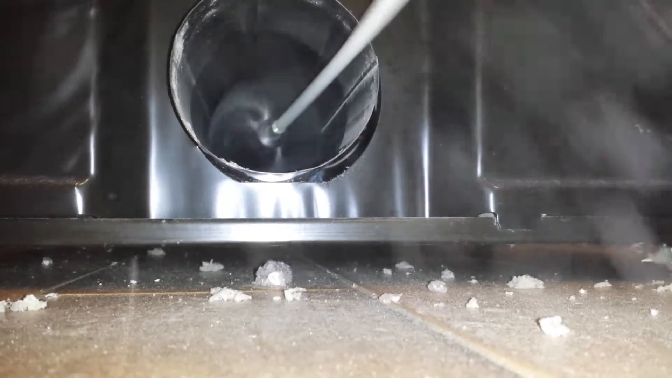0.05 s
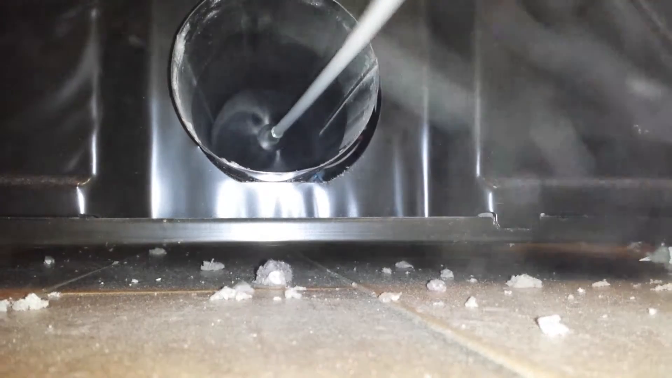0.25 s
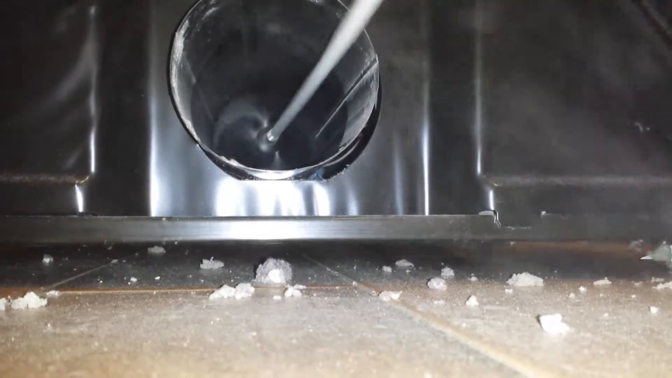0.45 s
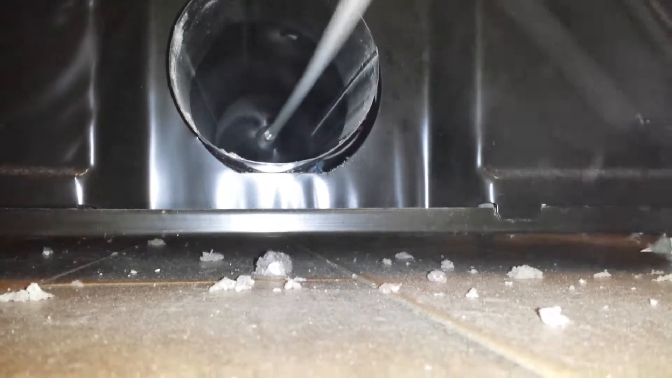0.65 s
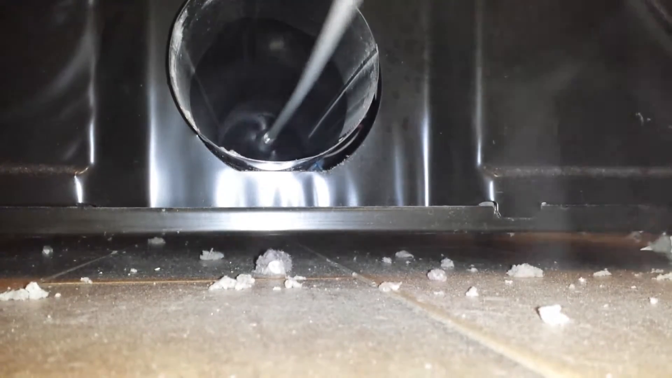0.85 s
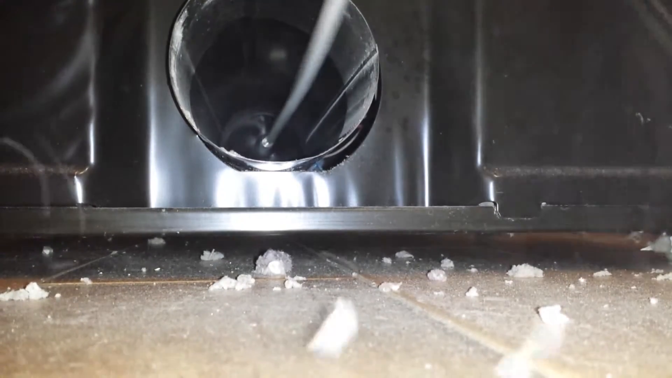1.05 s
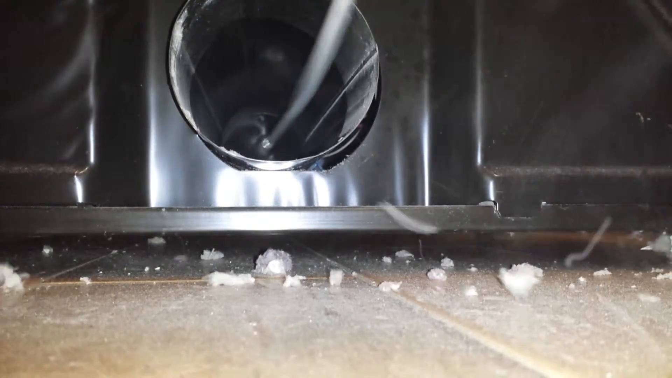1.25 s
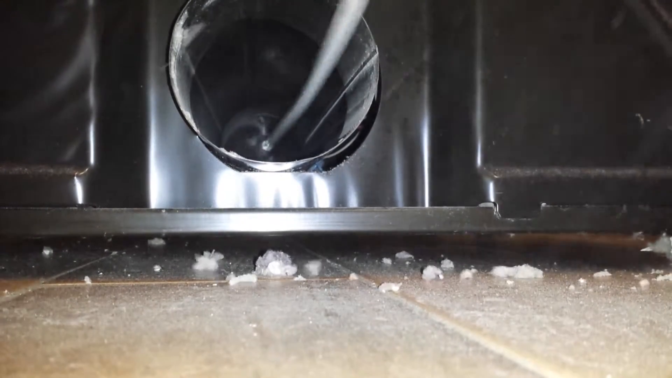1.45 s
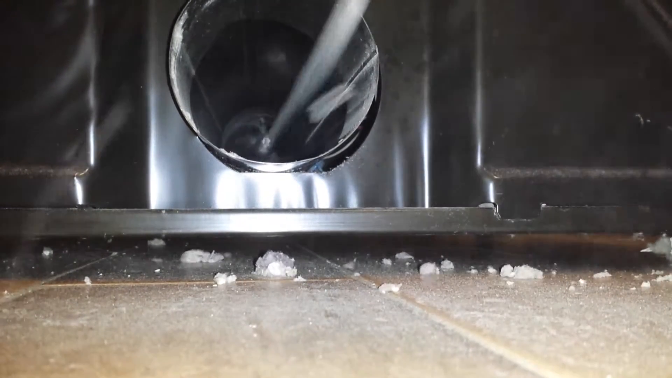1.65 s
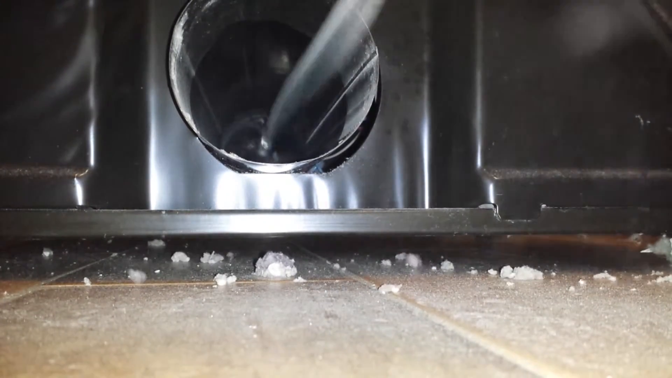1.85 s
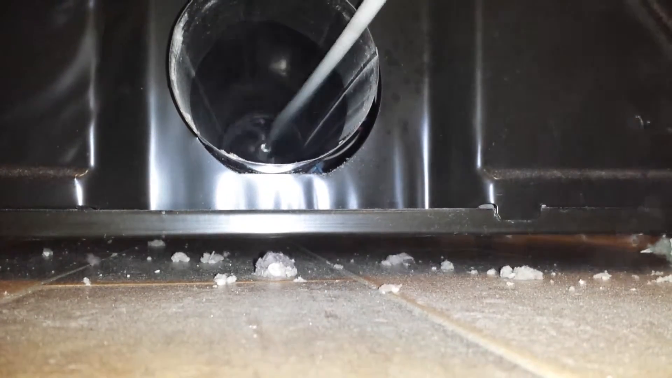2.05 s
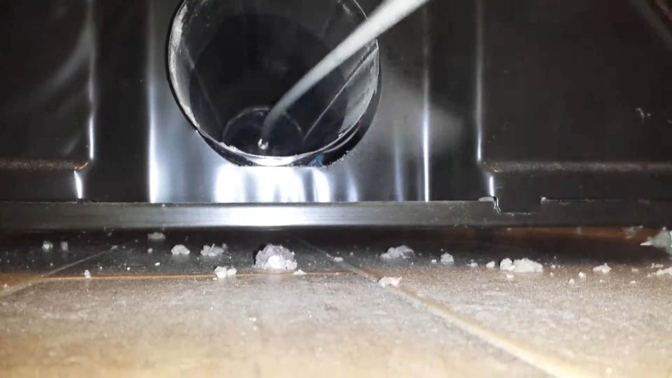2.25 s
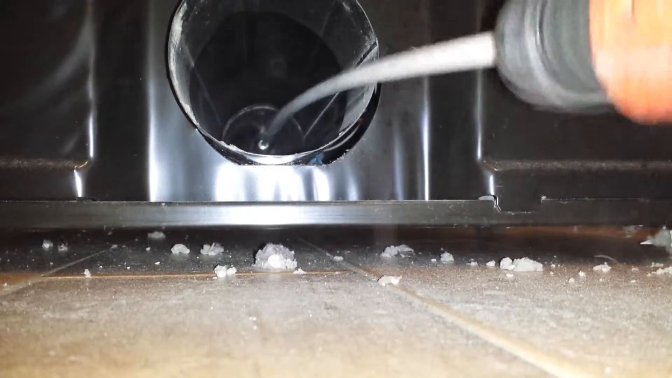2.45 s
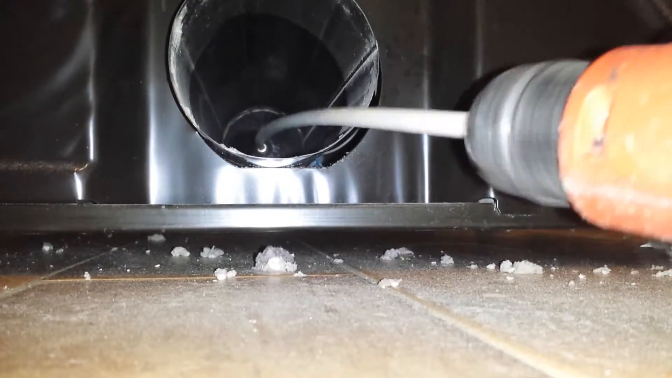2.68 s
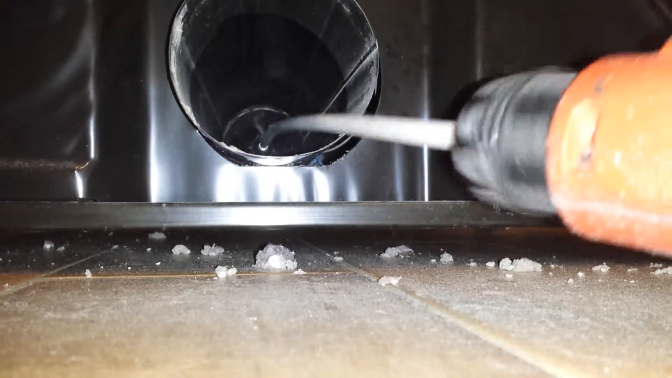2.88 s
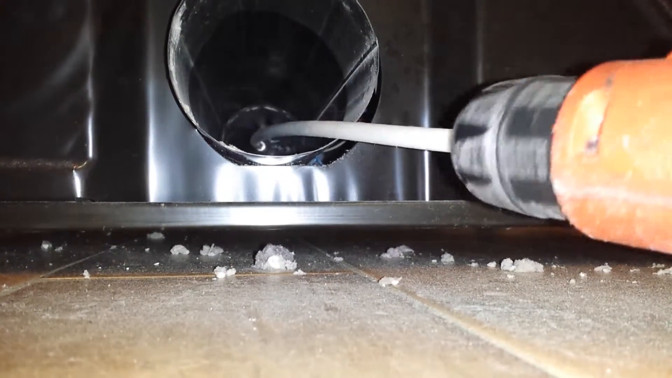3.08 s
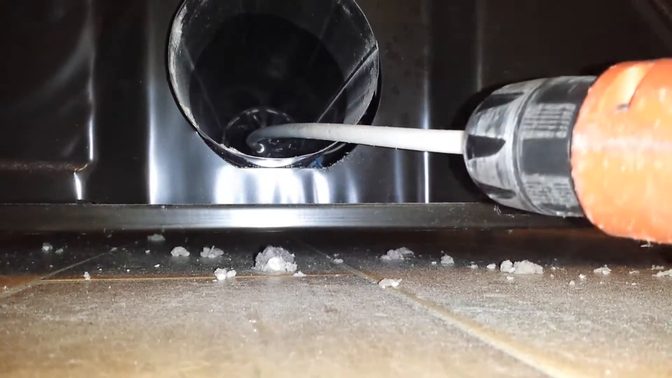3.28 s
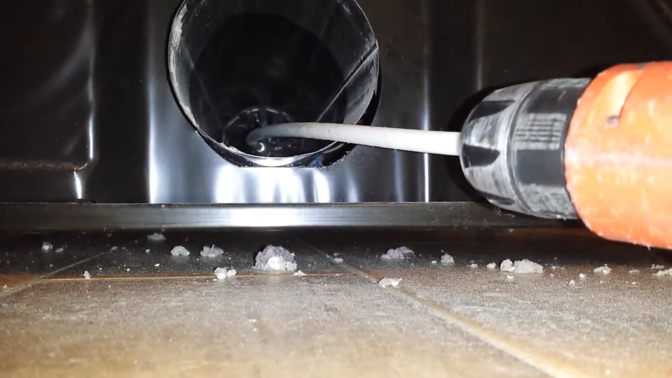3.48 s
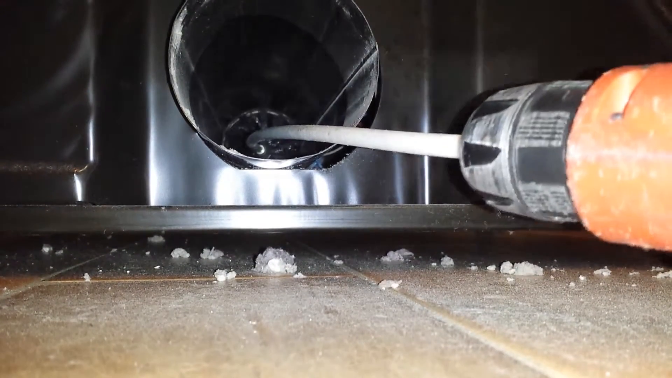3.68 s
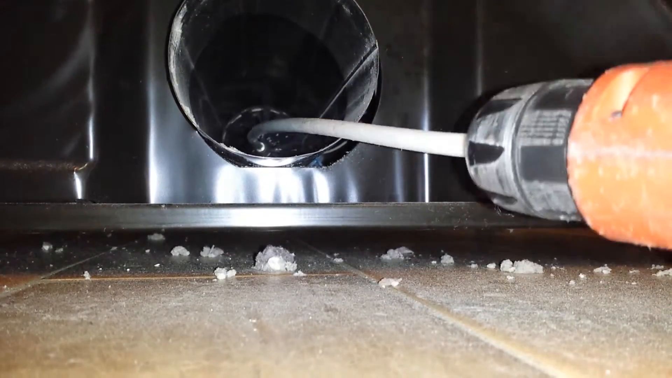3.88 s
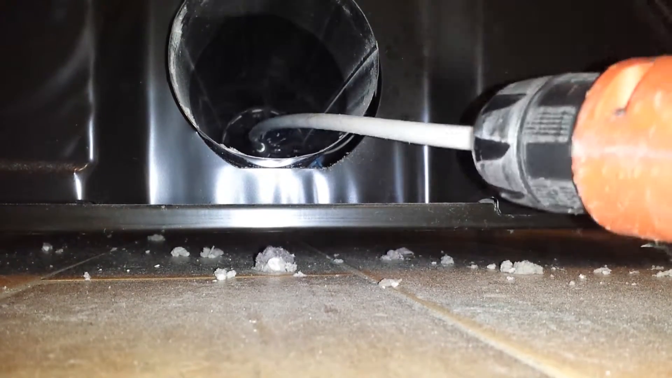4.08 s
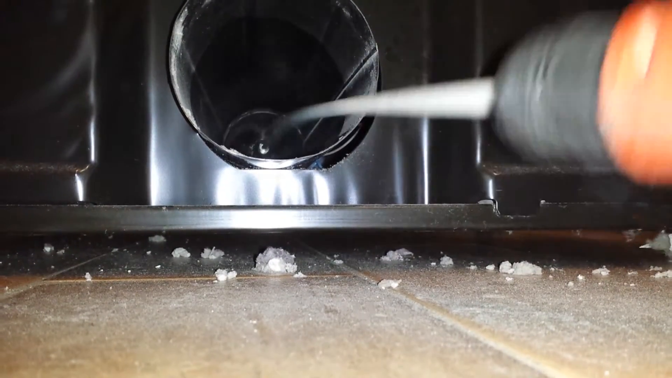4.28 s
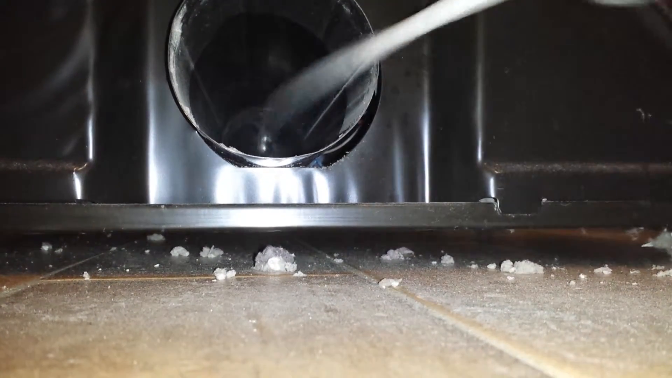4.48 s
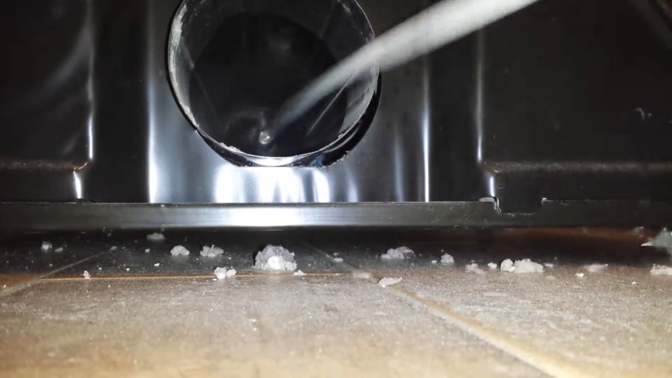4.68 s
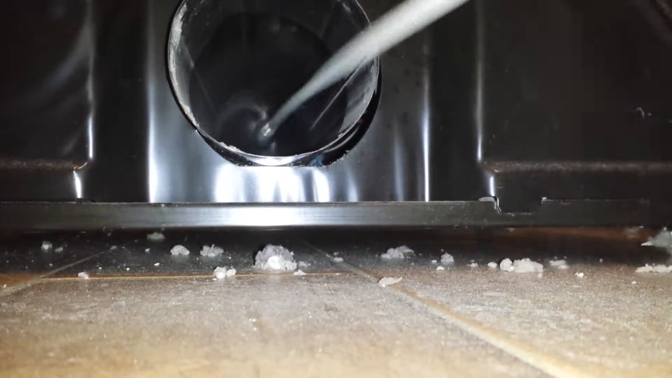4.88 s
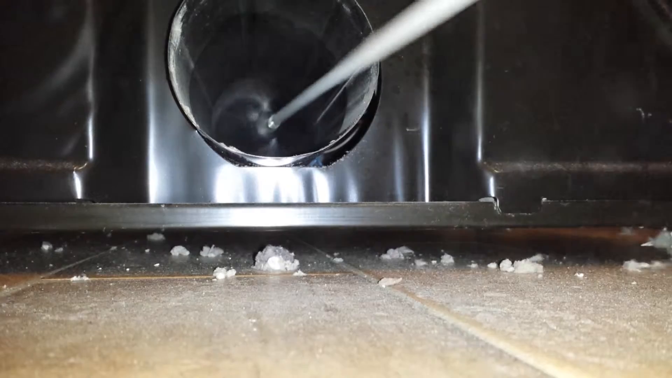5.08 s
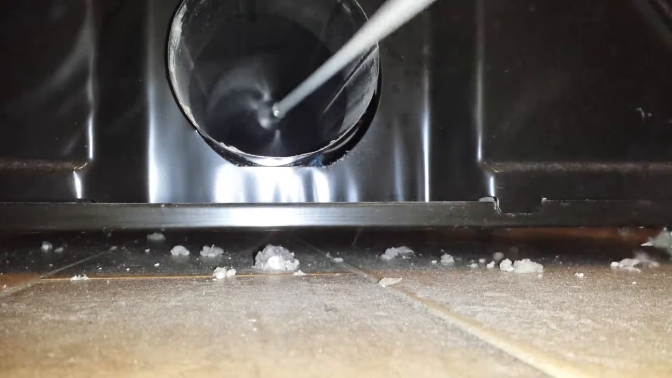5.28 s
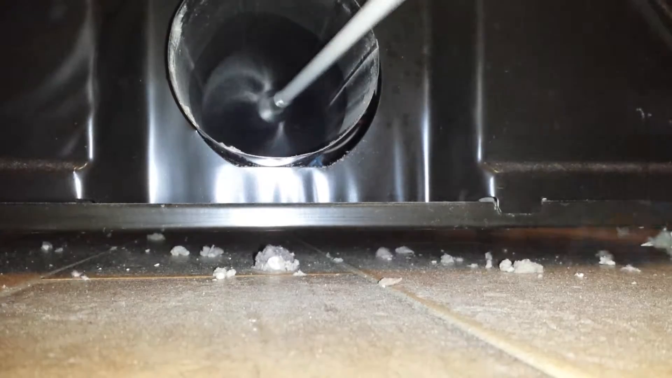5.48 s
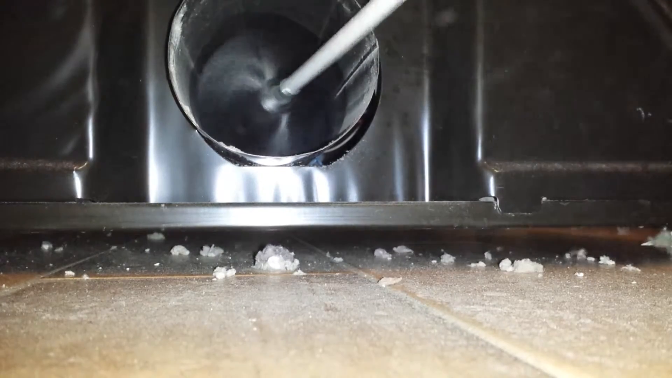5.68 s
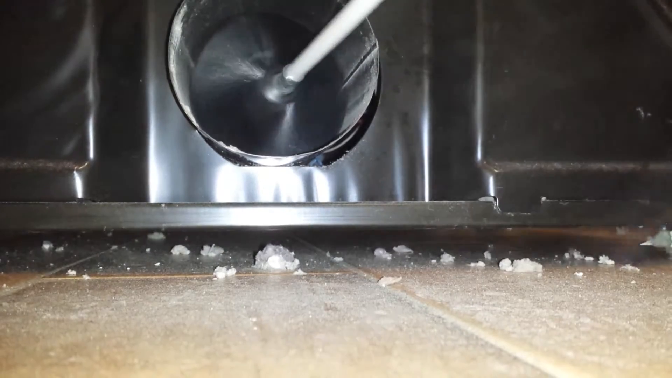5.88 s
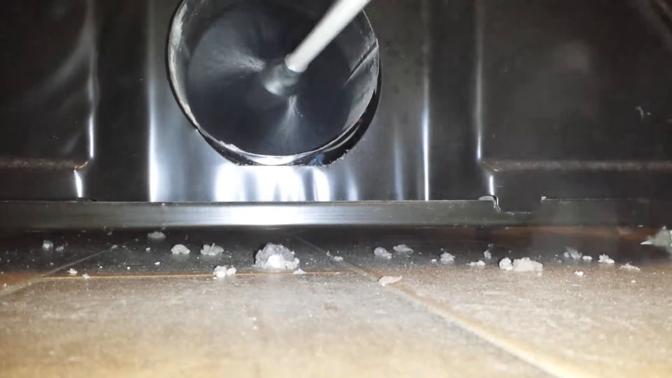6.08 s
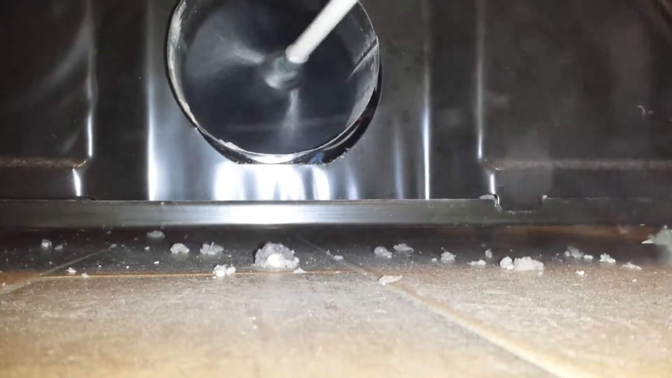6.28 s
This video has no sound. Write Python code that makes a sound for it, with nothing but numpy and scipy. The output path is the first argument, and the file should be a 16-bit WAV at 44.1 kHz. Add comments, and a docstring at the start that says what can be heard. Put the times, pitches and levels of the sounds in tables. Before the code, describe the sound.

Close, raspy drill whine and bristle hiss in a hollow duct slow to silence, then jerky cracks and a fast rising run-up back to speed.

```python
"""In a metal duct, a cordless drill spins a vent brush on a flexible rod, close to the microphone.
It whines at full speed, winds down to a ticking stop, is shifted in the hand, stutters and speeds up again.
One turning shaft drives the whine, the gear rasp and the brush noise; knocks and scrapes are shaped noise.
Cooling air sweeps across the two microphone ports in gusts, twice strongly; a mains hum lies under it all."""
import sys
import numpy as np
from scipy import signal
from scipy.fft import rfft, irfft, next_fast_len
from scipy.io import wavfile
from scipy.ndimage import uniform_filter1d, map_coordinates

SR = 44100
rng = np.random.default_rng(int(sys.argv[2]) if len(sys.argv) > 2 else 0)


def transcribe(signal):
    """Save signal, clipped to [-1, 1], as a 16-bit WAV file at the path in sys.argv[1]."""
    frames = np.atleast_2d(signal).T
    limited = np.clip(frames, -1, 1)
    pcm = np.round(limited * 32767).astype(np.int16)
    wavfile.write(sys.argv[1], SR, pcm)


N = 279594

TEETH = 8  # on the motor's gear
FULL_SPEED = 490  # turns per second
TOP_HZ = 14600  # nothing is heard above this
# Tone colours, from dull to bright: (frequency [Hz], relative level [dB])
# rasp of the gears in their housing
GEARBOX_COLOUR = [(200, -41), (400, -16), (680, -9), (900, -27), (1300, -7.5), (1900, -4.5), (2150, -3.5),
                  (2450, 2.5), (2800, 1.5), (3150, 1.5), (3800, -3.5), (4600, -23), (6000, -6.5),
                  (14000, -25)]
# hiss of the bristles
HISS_COLOUR = [(2350, -25.5), (4000, -6), (4220, -7), (4740, -5.5), (5140, -6.5), (5690, -4), (6670, -3.5),
               (7550, -1.5), (8850, -6.5), (14300, -25)]
# hollow rush in the metal duct
DUCT_COLOUR = [(60, -34), (200, -11.5), (330, -12.5), (480, 0), (620, -2.5), (780, -0.5), (1000, 4.5),
               (1500, 2), (2200, -2.5), (4000, -37)]
# air rumbling on the microphone
AIR_COLOUR = [(15, -58), (30, -29), (60, -7.5), (100, 1), (150, 1.5), (200, 0), (350, -3.5), (450, -5.5),
              (600, -6.5), (1300, -22.5), (2500, -60)]
# How the drill moves in the hand:
# (time [s], gearbox gain [dB], hiss gain [dB], left minus right [dB], brightest part of the hiss [Hz])
HAND_MOVES = [(0, 1, 0, .5, 7760), (.45, -1.5, 1, 2, 7620), (.97, 0, 3.5, 0, 6380),
              (1.2, 0.5, 3.5, -1, 6820), (1.6, 0, 0.4, -1.5, 6890), (2.27, 1, 1, -1, 7100),
              (2.48, 5.5, -0.9, 4, 6600), (2.88, 6, 5, 9.5, 6820), (3.17, -1.5, 2.5, 9, 6800),
              (4.37, 0.5, 1.5, 8.5, 6340), (4.58, 0.5, -1, 2, 6360), (4.72, 0.5, 4.5, 3.5, 6476),
              (4.93, 2, 4, 3.5, 6120), (5.35, -1, 0, 3, 5630), (5.75, 3, -.3, 4.5, 6210),
              (6.34, -0.5, -1, 3, 6300)]


def amp(db):
    """Decibels to gain."""
    return 10 ** (np.asarray(db) / 20)


def unit(x):
    """Scale so that the mean of the channels has an average strength (rms) of 1."""
    return x / np.sqrt(np.mean(np.atleast_2d(x).mean(0) ** 2) + 1e-20)


def along(points, hz):
    """Read a curve of (Hz, value) points, evenly spaced by pitch."""
    f, v = np.transpose(points)
    return np.interp(np.log(hz + 1), np.log(f + 1), v)


def curves(rows):
    """One value per sample for each column after the time."""
    s, *columns = np.transpose(rows)
    return [np.interp(np.arange(N) / SR, s, column) for column in columns]


def wobble(rate):
    """A smooth random curve that takes a new value `rate` times a second."""
    values = rng.standard_normal(int(N * rate / SR) + 4)
    return map_coordinates(values, [np.arange(N) * rate / SR])


def filtered(x, response):
    """Change the strength of each frequency in x by response(Hz)."""
    m = next_fast_len(N + SR // 2)
    return irfft(rfft(x, m) * response(np.fft.rfftfreq(m, 1 / SR)), m)[..., :N]


def coloured(x, colour):
    """Give x a (Hz, dB) tone colour, at rms 1."""
    return unit(filtered(x, lambda hz: amp(along(colour, hz))))


def noise(alike):
    """White stereo noise, partly shared by both sides (0: not at all, 1: fully)."""
    share = np.clip(alike, 0, 1)
    common = np.sqrt(share) * rng.standard_normal(N)
    return common + np.sqrt(1 - share) * rng.standard_normal((2, N))


def pan(lean_db):
    """Left and right gains for a level difference (left minus right)."""
    gains = amp(np.array([[1], [-1]]) * lean_db / 2)
    return gains / np.sqrt(np.mean(gains ** 2, axis=0))


def swell(s, rise, fall):
    """A smooth hump of height 1 at time s."""
    age = np.arange(N) / SR - s
    return np.exp(-(age / np.where(age < 0, rise, fall)) ** 2)


def burst(s, t60):
    """Envelope of a blow at time s: a quick rise, then a fall of 60 dB in t60 seconds."""
    age = np.maximum(np.arange(N) / SR - s, 0)
    return amp(-60 * np.minimum(age / t60, 5)) * (1 - np.exp(-age / 0.0007))


def at_ports(x, lag):
    """The further the drill is to the left, the later it reaches the right port (lag: s per dB)."""
    _, _, lean_db, _ = curves(HAND_MOVES)
    delay = lag * uniform_filter1d(lean_db, SR)
    return np.array([x[0], map_coordinates(x[1], [np.arange(N) - delay * SR])])


def shaft_speed():
    """Turns per second: full speed, a coast against friction and air drag, rest, and the run-up."""
    t = np.arange(N) / SR
    stop_s, friction = 3.2237, 173.75  # standstill (s), braking by friction (turns per s per s)
    drag_speed = 380.2  # air drag brakes as hard as friction here (turns per s)
    coast = drag_speed * np.tan(friction / drag_speed * np.maximum(stop_s - t, 0))
    # the trigger is squeezed again
    restart_s, squeeze_s = 4.24, .252
    pull = np.clip((t - restart_s) / squeeze_s, 0, 1)
    # at full pull the motor closes in on its free speed, in a quick and a slow stage
    since = np.maximum(t - restart_s - squeeze_s, 0)
    free_speed = 493
    run_up = free_speed - 68 * np.exp(-since / .088) - 129 * np.exp(-since / .38)
    return np.minimum(coast, FULL_SPEED) + pull ** 1.27 * run_up


def airflow():
    """Strength of the cooling air at each port: the gusts add in power."""
    # gusts over the microphone:
    # (time [s], strength [dB], rise [s], fall [s], left minus right [dB])
    gusts = [(.19, -45, 0.074, 0.052, 18), (.5, -49, 0.15, 0.24, 9), (.75, -29, 0.1, 0.11, 10),
             (1.12, -28, 0.12, 0.077, -12), (1.35, -12.8, .13, .13, -32), (1.7, -30.5, 0.3, 0.43, -11.5),
             (2.28, -35.5, .07, 0.13, 8), (2.6, -49, .2, 0.19, 2.5), (4.521, -32.5, 0.067, 0.12, 9.5),
             (4.69, -15.5, 0.1, 0.076, -13), (4.9, -28.5, 0.24, 0.36, 13), (5.33, -32.5, 0.12, 0.1, 20),
             (5.55, -44, 0.39, .55, 30)]
    power = sum((amp(db) * pan(lean_db) * swell(s, rise, fall)) ** 2 for s, db, rise, fall, lean_db in gusts)
    return np.sqrt(power)


def overtone(turns, order, flutter_db, drift, apart=0):
    """One multiple of the shaft, `apart` radians apart at the two ports; strength and phase wander."""
    size = amp(flutter_db * (wobble(20) + np.array([wobble(60), wobble(60)])) / 2)
    wander = drift * (wobble(12) + np.array([wobble(6), wobble(5)]) / 2)
    phase = 2 * np.pi * order * turns + wander
    return np.sqrt(2) * size * np.sin(phase - apart * np.array([[0], [1]]))


def tooth_strikes(speed, turns, decay, scatter_db, rub):
    """Each tooth gives a short burst: single ticks when slow, a smooth rasp when fast."""
    tooth = TEETH * turns
    age = (tooth % 1) / (TEETH * speed + 1e-6)
    size = amp(scatter_db * rng.standard_normal(N))[tooth.astype(int)]
    gate = rub + size * np.exp(-age / decay) * (speed > 1)
    # keep the loudness even over about 1/25 s
    return gate / np.sqrt(np.abs(uniform_filter1d(gate ** 2, SR // 25)))


def shaft_rattle(turns, pace):
    """The shaft rattles at whole multiples of its turning rate, strongest at full speed."""
    # (multiple of the shaft [1], level at full speed before tone colouring [dB])
    multiples = [(2, -22), (3, -26), (4, -29), (5, -22), (6, -25), (7, -29), (9, -29), (10, -27), (12, -23),
                 (13, -26), (15, -27), (16, -25), (18, -31)]
    return pace ** 3 * sum(amp(db) * overtone(turns, order, flutter_db=3, drift=.45) for order, db in multiples)


def gear_mesh(speed, turns):
    """Meshing gears sing at multiples of the shaft, standing out where the housing resonates."""
    # (multiple of the shaft [1], level before tone colouring [dB])
    multiples = [(16, -24), (18.9, -24), (21.3, -24), (24, -21), (32, -21.5), (41, -22), (48, -22.5),
                 (56, -24)]
    tones = sum(amp(db) * overtone(turns, order, flutter_db=5, drift=1.6, apart=1) for order, db in multiples)
    mesh = np.clip(speed / 60, 0, 1) * tones
    return filtered(mesh, lambda hz: amp(along(GEARBOX_COLOUR, hz)))


def brightened(x, width_hz):
    """A broad treble emphasis that slides and grows or shrinks as the drill turns in the hand."""
    hz, t, z = signal.stft(x, SR, nperseg=512)
    s, _, aim_db, _, bright_hz = np.transpose(HAND_MOVES)
    centre = np.interp(t, s, bright_hz)
    lift_db = 3 + np.interp(t, s, aim_db)
    lift = amp(lift_db * np.exp(-((hz[:, None] - centre) / width_hz) ** 2))
    # the emphasis changes the colour, not the loudness
    power = np.mean(np.abs(z) ** 2, axis=(0, 2))
    return unit(signal.istft(z * lift / np.sqrt(power @ lift ** 2), SR, nperseg=512)[1][:, :N])


def tooth_whine(speed, turns, pace, strain, facing):
    """The passing teeth whine, and whistle at five times that pitch; load and air change the whine."""
    # (speed [turns per s], whine before load and air [dB], whistle at five times its pitch [dB])
    whine_levels = [(0, -85, -85), (40, -58, -49), (105, -50, -46), (150, -43, -41), (191, -33, -25),
                    (250, -33.5, -41), (400, -28.5, -40), (460, -31, -65), (490, -34, -75)]
    speeds, *tones = np.transpose(whine_levels)
    whine_db, whistle_db = [np.interp(speed, speeds, db) for db in tones]
    # louder under load, softer while the air vent faces the microphone
    whine_db = whine_db + 11 * strain * pace ** 2 - 12 * facing ** 2
    whine = amp(whine_db) * overtone(turns, TEETH, flutter_db=2.5, drift=.5, apart=1.2)
    whistle = amp(whistle_db) * overtone(turns, 5 * TEETH, flutter_db=3, drift=.8, apart=.8)
    return whine + whistle * (speed * 5 * TEETH < TOP_HZ)


def drill():
    """One shaft drives whine, gear rasp and brush scrubbing; speed, strain and pose set their levels."""
    speed = shaft_speed()
    turns = np.cumsum(speed * (1 + .001 * wobble(25) + .0005 * wobble(4))) / SR
    near_db, aim_db, lean_db, _ = curves(HAND_MOVES)
    pace = speed / FULL_SPEED
    octaves = np.log2(pace + 1e-6)
    # speeding up loads the gears (80: turns per s per s)
    strain = np.tanh(np.maximum(np.gradient(speed) * SR, 0) / 80)
    # how squarely the air vent faces the microphone, 0 to 1
    air = airflow().sum(0)
    facing = air / air.max()
    # gears and bristles clatter as the brush breaks loose
    kick = swell(4.315, rise=.06, fall=.035)

    # base level (dB), growth per doubling of speed (dB), then the other influences
    gear_db = -28 + 0.68 * octaves + near_db + 5.5 * strain + 6 * kick
    hiss_db = -16.5 + 4.5 * octaves + aim_db + 8.5 * kick
    duct_db = -31 + 2.5 * octaves + 5.5 * facing
    rotor_db = -33 + 15 * octaves + 1.8 * aim_db

    strikes = tooth_strikes(speed, turns, decay=0.0015, scatter_db=1.5, rub=0.25)
    rattle = shaft_rattle(turns, pace)
    rasp = strikes * noise(0.27) + rattle + gear_mesh(speed, turns)
    gears = amp(gear_db) * amp(wobble(11) / 2 ) * coloured(rasp, GEARBOX_COLOUR)
    scrub = coloured(strikes * noise(0.066) + rattle, HISS_COLOUR)
    hiss = amp(hiss_db) * brightened(scrub, width_hz=1500)
    duct = amp(duct_db) * coloured(np.sqrt(strikes) * noise(0.77) + rattle, DUCT_COLOUR)
    # unbalance of the rotor, and of a slower planet gear that only sounds near full speed
    rotor = amp(rotor_db) * overtone(turns, 1, flutter_db=1.1, drift=.1)
    planet = amp(-44) * pace ** 8 * overtone(turns, .59, flutter_db=1.2, drift=.2)

    # the geared-down chuck loads the motor once and twice per turn
    chuck = 2 * np.pi * turns / 16.6
    load = amp(0.37 * np.sin(chuck) + 0.84 * np.sin(2 * chuck) + 0.26 * wobble(40))
    # all but the rotor and planet gear fade near standstill: half as strong at 9.4 turns per s
    moving = speed ** 2 / (speed ** 2 + 9.4 ** 2)
    gain = moving * load * pan(lean_db)
    whine = tooth_whine(speed, turns, pace, strain, facing)
    return at_ports(gain * (gears + hiss + duct) + rotor + planet, lag=.000047) + gain * whine


def draught():
    """Air from the motor fan buffets each port on its own, over a faint stir that follows the fan's speed."""
    stir = amp(-55) * (shaft_speed() / FULL_SPEED) ** .12
    quick = 2.2 * np.array([wobble(50), wobble(50)])
    slow = 0.51 * np.array([wobble(12), wobble(16)])
    lumps = amp(quick + slow) * coloured(noise(0.033), AIR_COLOUR)
    return (airflow() + stir) * unit(lumps)


def room_tone():
    """Still air as faint noise, and a mains hum as one steady low tone."""
    # colour of the still air: (frequency [Hz], relative level [dB])
    still_colour = [(15, -41), (25, -15), (27, -25), (85, -28), (102, -11), (126, -11), (182, -27),
                    (382, -26), (1360, -34), (14000, -38.5)]
    mains = amp(-67.5) * np.sin(2 * np.pi * 119 * np.arange(N) / SR)
    still_air = amp(-72) * coloured(noise(.4), still_colour)
    return mains + still_air


def walls(x):
    """A short tail from the nearby cabinet and walls: x smeared by fading noise."""
    # how long the tail takes to fall 60 dB: (frequency [Hz], time [s])
    tail_times = [(200, 0.22), (2000, 0.26), (10000, 0.21)]
    hz, t, z = signal.stft(rng.standard_normal((2, SR // 3)), SR, nperseg=256)
    fade = amp(-60 * t / along(tail_times, hz)[:, None])
    tail = signal.istft(z * fade, SR, nperseg=256)[1]
    return signal.fftconvolve(x, tail / np.linalg.norm(tail[0]), axes=1)[:, :N]


def bumps():
    """The brush bumps softly in the duct: short bursts of dull noise."""
    # (time [s], level before a 2 dB cut [dB])
    bump_list = [(2.729, -30), (2.75, -34), (3.778, -50), (5.48, -15.5)]
    thud = coloured(noise(0.41), [(40, -20.5), (120, -2.0), (250, -3), (500, -12.5), (1500, -36), (5000, -71.5)])
    return thud * sum(amp(db - 2.0) * burst(s, t60=.11) for s, db in bump_list)


def crack():
    """Bright noise for hard knocks."""
    return coloured(noise(.2), [(200, -12.0), (900, -11), (2600, -4), (4500, -8.5), (6000, -4.5),
                                (10000, -20.0), (14000, -33)])


def taps():
    """The rod taps the duct: a crack of noise, then a brief ring of a few tones."""
    # (time [s], level before a 3.5 dB cut [dB], ring against the uncut tap, before a 2 dB lift [dB])
    tap_list = [(2.7321, -14.5, -35), (3.3712, -46.5, -4), (3.7994, -40, -33), (3.8367, -37.5, -7),
                (4.066, -34, -7.5)]
    # tones of the rod: (frequency [Hz], relative level [dB], unused [s])
    rod_tones = [(266, -11, 0.18), (360, 5.5, 0.17), (503, -4.5, 0.28), (705, -8, 0.15), (850, -10, 0.97)]
    t = np.arange(N) / SR
    knock = crack() * sum(amp(db - 3.5) * burst(s, t60=0.045) for s, db, _ in tap_list)
    ring = unit(sum(amp(db) * np.sin(2 * np.pi * hz * t) for hz, db, _ in rod_tones))
    rings = ring * sum(amp(db + ring_db + 2) * burst(s + 0.005, t60=0.12) for s, db, ring_db in tap_list)
    return knock + rings


def scrapes():
    """Bristles drag on the duct wall while the motor rests; the housing and the duct answer faintly."""
    # (time [s], level [dB], rise [s], fall [s])
    strokes = [(3.22, -57, .05, .05), (3.34, -56, 0.065, .05), (3.48, -79, .06, .1),
               (3.815, -50, 0.021, 0.036), (3.9, -49.5, .05, 0.065), (4.02, -49.5, .025, .06),
               (4.165, -38, .025, .03)]
    stroke = sum(amp(db) * swell(s, rise, fall) for s, db, rise, fall in strokes)
    bristles = coloured(noise(.06), HISS_COLOUR) + amp(-12.5) * coloured(noise(.24), GEARBOX_COLOUR)
    body = amp(-11) * coloured(noise(.6), DUCT_COLOUR) + amp(-8.5) * coloured(noise(.3), AIR_COLOUR)
    heard = at_ports(bristles + body, lag=.000045)
    return stroke * amp(1.5 * wobble(60)) * pan(4.5) * heard


def jerks():
    """The gears take up the load in jerks: short cracks of noise, stronger on the left."""
    # (time [s], level before a 5.5 dB cut and the side gains [dB])
    jerk_list = [(4.139, -32), (4.1603, -22.5), (4.1922, -21.5), (4.209, -16), (4.227, -15.5),
                 (4.2416, -9.5), (4.261, -17.5), (4.277, -12.5)]
    cracks = crack() * sum(amp(db - 5.5) * burst(s, t60=0.047) for s, db in jerk_list)
    return cracks * amp([[2.5], [-4]])


def scene():
    """The drill, its knocks and scrapes in a small room, with air on the microphone."""
    work = drill() + bumps() + taps() + scrapes() + jerks()
    return work + amp(-8.0) * walls(work) + draught() + room_tone()


def record(dry):
    """Each port adds its colour; peaks round off near full scale; nothing stays above the band limit."""
    # how the two ports differ: (frequency [Hz], left minus right [dB])
    port_lean = [(50, 8), (110, 2.5), (200, -0.5), (3500, -1), (5200, 3.5), (6200, 2.5), (7400, -10),
                 (9000, -7), (10300, -7), (11200, -2.5), (14000, -17.5)]
    heard = filtered(dry, lambda hz: pan(along(port_lean, hz)))
    rounded = heard / (1 + np.abs(heard) ** 8) ** (1 / 8)
    return filtered(rounded, lambda hz: hz < TOP_HZ)


dry = scene()
out = record(dry)
transcribe(out)
```